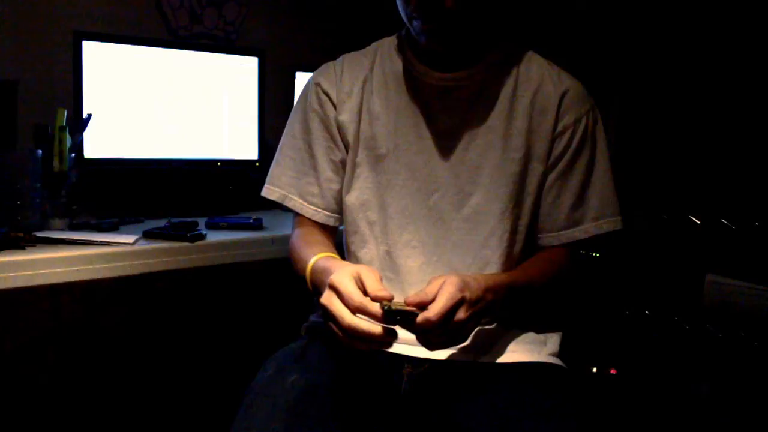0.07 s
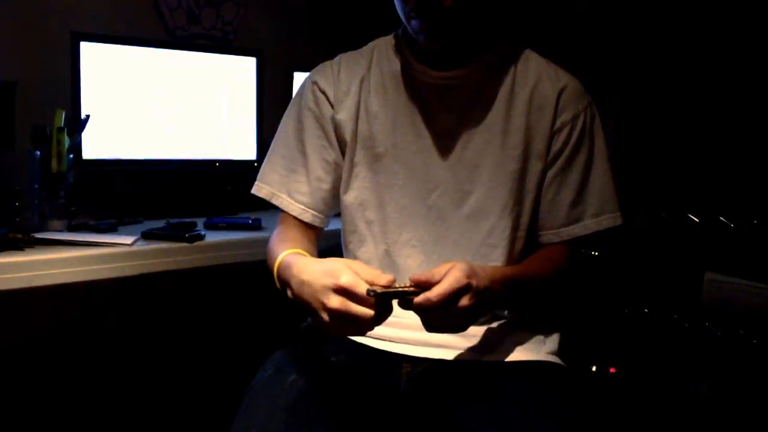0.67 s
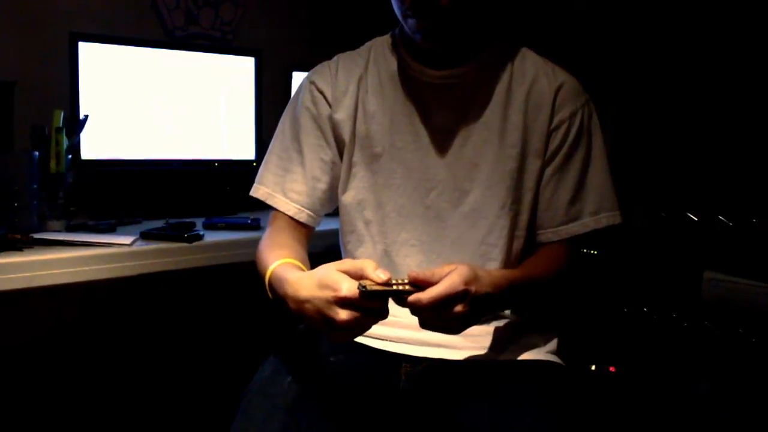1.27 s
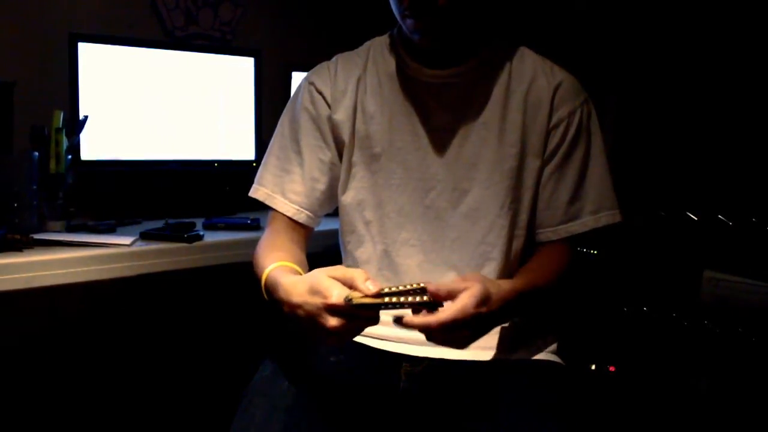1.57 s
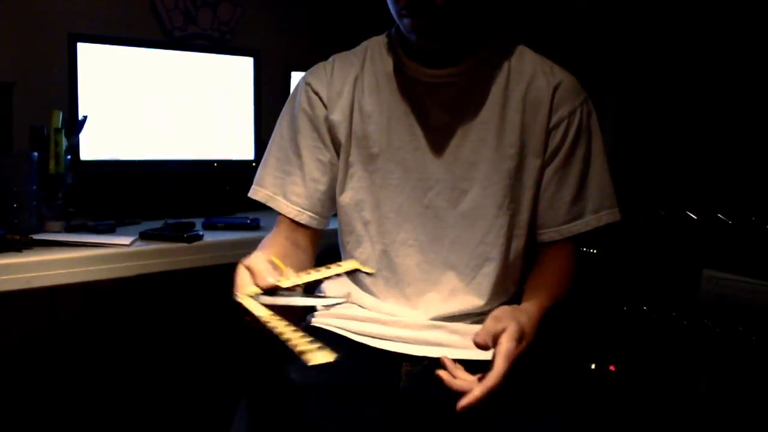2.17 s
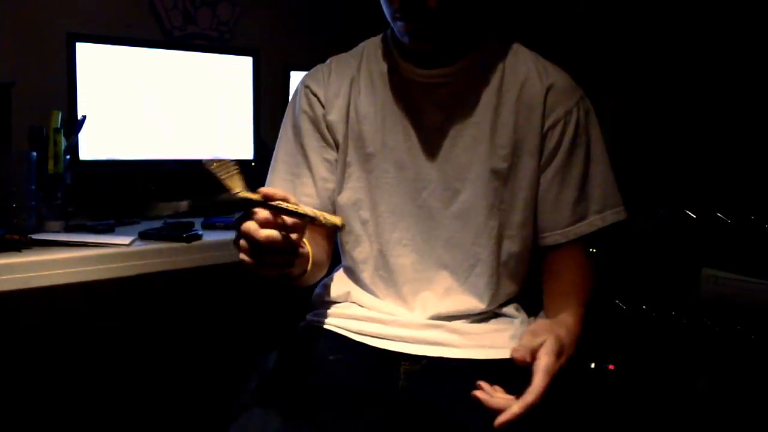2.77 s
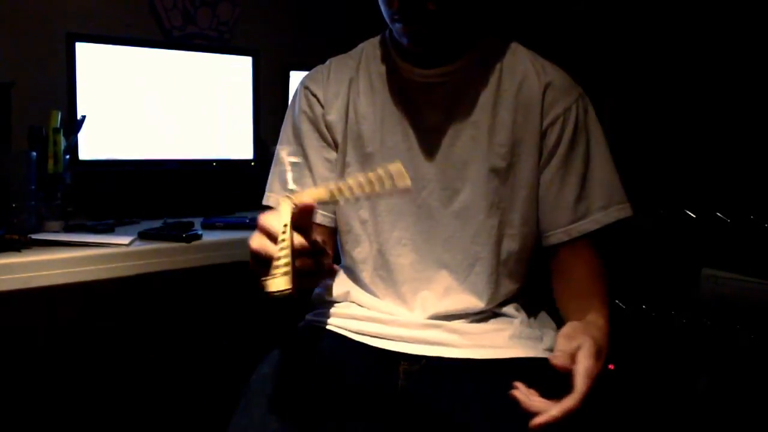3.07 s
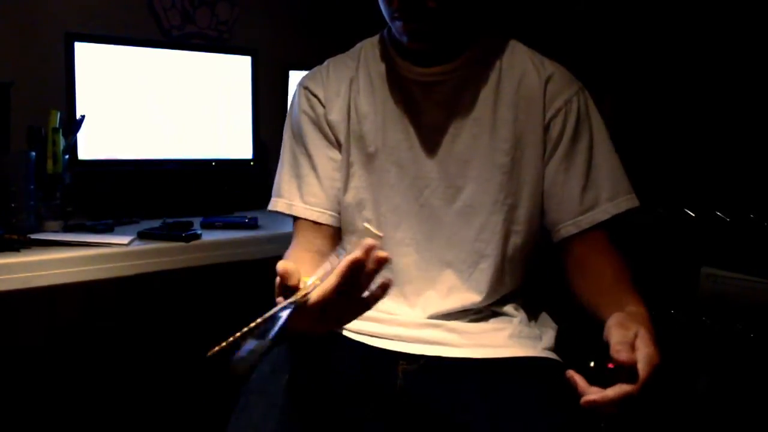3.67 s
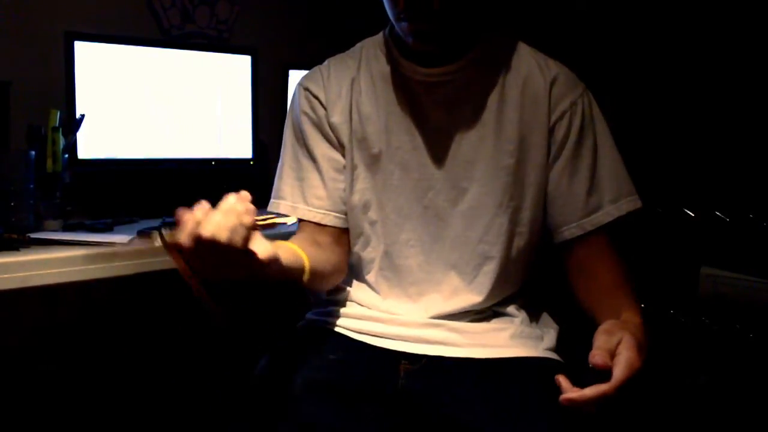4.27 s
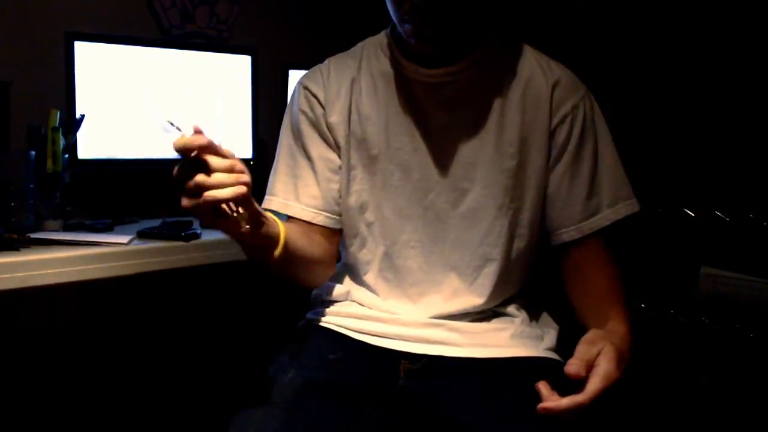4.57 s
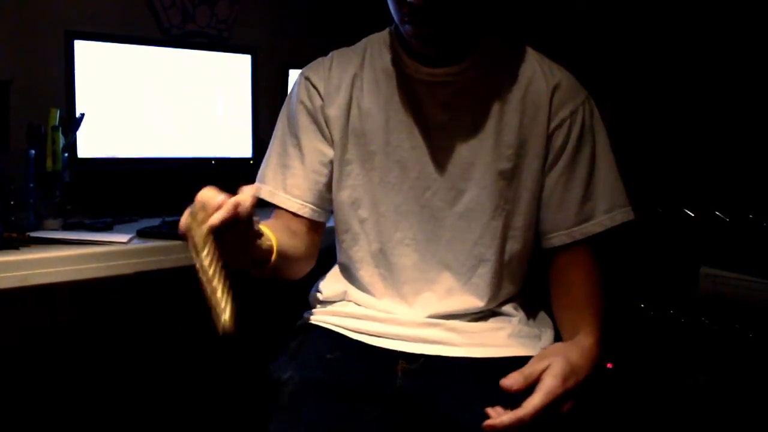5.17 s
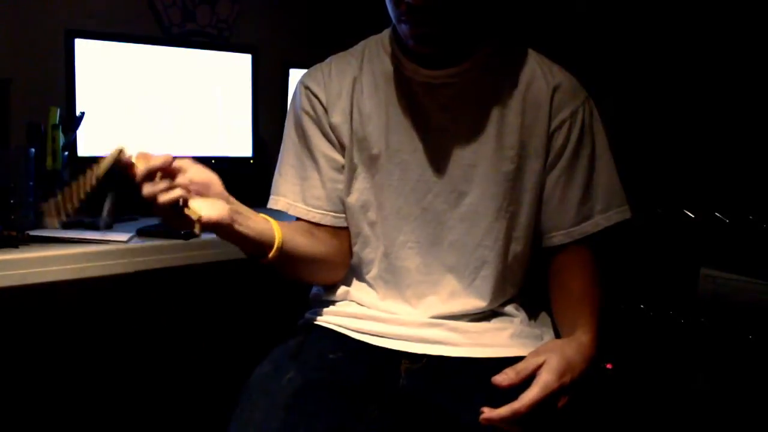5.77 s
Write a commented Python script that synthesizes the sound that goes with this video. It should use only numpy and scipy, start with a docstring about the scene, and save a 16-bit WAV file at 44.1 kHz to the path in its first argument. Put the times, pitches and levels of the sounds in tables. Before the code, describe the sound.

Light metal clicks, then two runs of sharp, ringing clacks as a butterfly knife swings open and shut in an echoing room.

```python
"""Butterfly knife flips

A butterfly knife is unlatched and flipped about a metre from a small microphone in a quiet,
hard-walled room. Handles and blade knock together and chatter in their loose pivots; each blow
rings the steel, then the room. It opens on the dying echo of one clack, over faint rumble and hiss."""
import sys
import numpy as np
from scipy import signal
from scipy.fft import rfft, irfft
from scipy.io import wavfile
from scipy.ndimage import uniform_filter1d

SR = 44100
rng = np.random.default_rng(int(sys.argv[2]) if len(sys.argv) > 2 else 0)


def waveform_to_disk(signal):
    """Save audio, clipped to [-1, 1], as 16-bit WAV at the path in sys.argv[1]."""
    frames = np.transpose(np.atleast_2d(signal))
    scaled = np.clip(frames, -1, 1) * 32767
    samples = np.round(scaled).astype(np.int16)
    wavfile.write(sys.argv[1], SR, samples)


N = 256220
OPENS_S = 0.16

# Handle and blade hits: t/s, relative level near 2.8 kHz/dB, chatter/s, main ring f/Hz,
# weight/dB, brightness/dB
BLOWS = [(1.109, -52.5, .012, 1600, 15.5, 1), (1.226, -50.5, 0.017, 3210, 3, 0),
         (1.249, -45.5, 0.0058, 3240, 8.5, 2), (1.344, -59.5, 0.0073, 1570, 10, 1),
         (1.571, -39.5, 0.028, 1710, 6, -4.5), (2.021, -50.5, 0.0057, 2165, 7.5, -0.5),
         (2.305, -52.5, 0.0037, 3230, 5.5, -6), (2.364, -54, .01, 2320, 7, -7),
         (2.451, -51, 0.0064, 1670, 11.5, -5), (2.5195, -20.5, 0.0097, 2810, 3, 4),
         (2.928, -43.5, 0.0057, 2980, 2.5, 0), (2.944, -27, 0.011, 3080, -2.5, 3),
         (2.969, -23.5, 0.024, 2800, 0, -1.5), (3.011, -27.5, 0.017, 3090, -0.5, -7.5),
         (3.092, -32.5, 0.0042, 2800, 5.5, -3), (3.115, -35.5, 0.01, 2630, 1.5, 1.5),
         (3.153, -21.5, 0.014, 3360, 9.5, 1.5), (3.189, -22, 0.03, 2820, -7.5, -1.5),
         (3.249, -27, 0.008, 2680, -13, -2.5), (3.334, -34, 0.0041, 3110, 6, -9),
         (3.342, -22, .007, 3036, -1.5, 1.5), (3.416, -30.5, 0.011, 2510, 2.5, -3),
         (3.53, -26.5, .013, 4020, -3, 4), (3.617, -26, 0.0089, 4110, -10.5, 3.5),
         (3.63, -22.5, 0.031, 3700, -1.5, -4), (3.715, -18, 0.02, 2800, 7, -1.5),
         (3.733, -13.5, 0.016, 2773, -2, 2), (3.75, -14.5, 0.022, 2730, -8, -0.5),
         (3.856, -28.5, 0.013, 3060, -0.5, 4), (3.895, -22, 0.012, 2740, -1.5, 3.5),
         (3.95, -34, 0.0037, 3180, 11, -4), (3.974, -20.5, 0.0083, 2960, -8.5, -0.5),
         (4.139, -36.5, 0.013, 2990, 8.5, 2), (4.376, -42, .014, 1670, 7, -9),
         (4.527, -53, 0.0051, 2710, -10.5, -5.5), (4.778, -41.5, 0.0095, 3410, 3, 0.5),
         (4.782, -22, 0.015, 3280, -6, -3), (4.9, -38.5, 0.0091, 3000, 0.5, 5),
         (5.116, -39, 0.0084, 2920, 4.5, -7.5), (5.216, -20.5, 0.046, 3060, 4, 4),
         (5.267, -17, 0.015, 2600, -2.5, -3), (5.281, -15.5, 0.0085, 3040, 0.5, 2),
         (5.327, -28.5, 0.011, 3100, 11, 4), (5.35, -15, 0.0097, 3220, -11, -3),
         (5.457, -29, 0.0068, 2630, 3, -1.5), (5.5045, -17.5, 0.0094, 3007, 2, -1),
         (5.561, -27, 0.012, 2940, 4, -4), (5.649, -30.5, 0.0092, 2610, 4.5, -3),
         (5.748, -15.5, .004, 3000, -11.5, -13), (5.777, -29, .01, 2630, 1.5, -6.5)]
# Room send, riding up and down as the hand turns: t/s, relative level/dB
ROOM_SEND = [(1.5, -1.5), (2.52, -1.5), (3.0, -6), (3.3, 0), (3.72, -1), (3.86, 10), (3.98, -4.5),
             (4.78, 7), (5.21, 4), (5.28, -1.5), (5.75, -7)]
def knife(force_db=41, direct_db=1.68, forward_db=-3, opening_db=-28):
    """All the clacks on three paths: straight at the microphone, forward and sideways into the room."""
    direct, forward, sideways = np.zeros((3, N))
    t = np.arange(6000) / SR
    grips = [steel_modes(t) for _ in range(9)]
    for k, (start, db, *character) in enumerate(BLOWS):
        modes = grips[k % len(grips)]
        send_db = np.interp(start, *np.transpose(ROOM_SEND))
        hit = clack(t, modes, db + force_db, *character)
        add(direct, start, hit * undb(direct_db))
        add(forward, start, hit * undb(send_db + forward_db))
        add(sideways, start, clack(t, modes, db + force_db + send_db, *character))
    # the opening clack is heard only through the room
    for path, modes in zip((forward, sideways), grips):
        hit = blow(t, modes, opening_db + force_db, tone_db=(-16.5, -10, -6),
                   chatter_s=0.038, ring_hz=2708, ring_db=11)
        add(path, OPENS_S, hit)
    return direct, forward, sideways


def clack(t, modes, db, chatter_s, ring_hz, weight_db, bright_db, rebound_s=0.0105):
    """One blow, then the other handle's rebound: weaker but heavier, with a ring of its own."""
    tone_db = np.array([-14.5 + 0.48 * weight_db, -10 + weight_db, -5 + bright_db])  # knock, lows, highs
    ring_db = 9.5 - 5 * np.log2(chatter_s / 0.01)  # a short contact rings cleanest
    hit = blow(t, modes, db, tone_db, chatter_s, ring_hz, ring_db)
    rebound = blow(t, modes, db - 13, tone_db + (3.5, 2.5, 2.5),
                   chatter_s=0.0093, ring_hz=2703, ring_db=7)
    add(hit, rebound_s, rebound)
    return hit


def blow(t, modes, db, tone_db, chatter_s, ring_hz, ring_db):
    """Steel on steel: the point of contact weights the modes, the angle sets the main ring and tone."""
    contacts = pivot_chatter(t, chatter_s)
    mode_gains = undb(-2 * rng.standard_normal(len(modes)))
    body = mode_gains @ modes + ring(t, ring_hz, ring_db, t60=0.028)
    body[0] += 1  # lets the bare crack through
    knock_db, low_db, high_db = tone_db
    eq_hz = [120, 420, 780, 1700, 2800, 4100, 8000]
    eq_db = [knock_db - 17, knock_db - 7, knock_db, low_db, 0, high_db, high_db - 3]
    hz = np.fft.rfftfreq(len(t), 1 / SR)[1:]
    shape_db = db + np.interp(np.log(hz), np.log(eq_hz), eq_db)
    # the EQ sets the energy in each region; chatter and modes only share it out
    gain_db = shape_db - contour(contacts, width_hz=480) - contour(body, width_hz=1500)
    struck = signal.fftconvolve(contacts, body)[:len(t)]
    return colour(struck, np.c_[hz, gain_db])


def pivot_chatter(t, chatter_s, contacts_per_s=1300, grit=0.22):
    """One hard contact, then a dying rattle from the play in the pivots; each contact cracks."""
    touches = rng.random(len(t)) < contacts_per_s / SR
    strength = rng.uniform(-1.07, 1, len(t))
    impacts = strength * touches * np.exp(-(t / chatter_s) ** 2)
    crack = grit * rng.standard_normal(len(t)) * fade(t, t60=0.012)
    impacts[0] = crack[0] = 1
    return signal.fftconvolve(impacts, crack)[:len(t)]


# Modes of handles and blade: f/Hz, level against the bare crack/dB, t60/s
STEEL_MODES = [(336.7, 11, 0.21), (861, 3, 0.12), (991, -5.5, 0.13), (1493, -7, 0.047), (1688, 5, 0.063),
               (1770, -8.5, 0.093), (2202, -5.5, 0.031), (2423, -1.5, 0.055), (2652, 5.5, .12),
               (2976, -2.5, 0.17), (3220, -5.5, 0.058), (3350, -10.5, 0.15), (3990, -12, 0.24),
               (3855, 6.5, 0.095), (3990, 2, 0.05), (4617, 7, 0.11), (4710, 2, 0.037), (7350, 9.5, 0.13),
               (8100, 14, 0.18), (9100, 4.5, 0.088)]
def steel_modes(t, detune=0.0036):
    """The steel's modes for one way of holding and opening the knife, each shifted a little."""
    return np.array([ring(t, hz * (1 + detune * rng.standard_normal()), db, t60)
                     for hz, db, t60 in STEEL_MODES])


def ring(t, hz, db, t60):
    """A mode's decaying tone, scaled so that its resonance peaks at db."""
    return undb(db) * 2 * np.log(1000) / (t60 * SR) * np.cos(2 * np.pi * hz * t) * fade(t, t60)


# Ring-outs after certain hits: t/s, f/Hz, level/dB, t60/s
RING_OUTS = [(1.568, 1750, -40.5, 0.12), (1.578, 2657, -40.5, 0.21), (1.578, 3930, -51.5, 0.13),
             (2.52, 4080, -23.5, 0.1), (2.52, 4630, -14.5, 0.098), (2.518, 7520, -21, 0.13),
             (2.52, 880, -49.5, 0.056), (3.617, 847, -33.5, 0.18), (5.505, 3890, -29, 0.26),
             (5.749, 2930, -37, 0.024), (5.749, 850, -32.5, 0.32)]
def singing_steel():
    """A part that swings clear of the hand sings on in pure, fading tones."""
    track = np.zeros(N)
    t = np.arange(SR // 2) / SR
    for start, hz, db, t60 in RING_OUTS:
        add(track, start, undb(db) * np.sin(2 * np.pi * hz * t) * fade(t, t60))
    return track


# Reverb bands of the hard-walled room: f/Hz, relative level/dB, t60/s
REVERB_BANDS = [(150, 5, 0.57), (504, 2.5, 1), (1290, 3, 0.94), (2470, -1, 0.82), (3950, -0.5, 0.64),
                (5300, -3, 0.47), (8000, -1.5, 0.63)]
def room(x, wet_db=-4, predelay_s=0.0054, attack_s=0.0016, early_per_s=1200, mixing_s=0.05):
    """Separate wall reflections thicken into a diffuse tail whose mids hang on longest."""
    t = np.arange(SR) / SR
    density = np.minimum(early_per_s / SR * (1 + (t / mixing_s) ** 2), 1)
    echoes = rng.standard_normal(SR) * (rng.random(SR) < density) / np.sqrt(density)
    spectrum = rfft(echoes)
    log_hz = np.log(np.maximum(np.fft.rfftfreq(SR, 1 / SR), 1))
    centres = np.log(np.array(REVERB_BANDS)[:, 0])
    tail = np.zeros(SR)
    for share, (_, db, t60) in zip(np.eye(len(centres)), REVERB_BANDS):
        band = irfft(spectrum * np.interp(log_hz, centres, share), SR)
        tail += band * undb(db) * fade(t, t60)
    tail *= np.clip((t - predelay_s) / attack_s, 0, 1)
    return undb(wet_db) * signal.fftconvolve(x, tail / np.linalg.norm(tail))[:N]


# Microphone EQ, deeply notched near 6 kHz: f/Hz, level/dB
MIC_EQ = [(30, -11.5), (4100, 1), (4700, -7), (5200, -14), (5700, -35.5), (6200, -43), (6700, -27),
          (7300, -20.5), (8200, -23), (9200, -32), (9700, -43.5), (10300, -55)]
def microphone(x):
    """The small microphone favours the upper mids and dulls the top."""
    return colour(x, MIC_EQ)


# Spectrum of the noise bed: f/Hz, relative level/dB
ROOM_TONE = [(15, -31), (25, -0.5), (59, -1.5), (134, -7.5), (227, -7.5), (365, -7.5), (404, -13),
             (519, -11.5), (1280, -19.5), (1380, -21), (4160, -27.5), (4830, -43), (10000, -77.5),
             (13000, -101), (22000, -120)]
def room_tone(rms_db=-52):
    """Steady rumble and hiss of the quiet room."""
    bed = colour(rng.standard_normal(N), ROOM_TONE, size=8192)
    return bed / np.sqrt(np.mean(bed ** 2)) * undb(rms_db)


def gain_control(x, threshold_db=-24, memory_s=0.5, slope=0.38):
    """Automatic gain ducks a little after loud clatter and slowly recovers."""
    keep = np.exp(-1 / (memory_s * SR))
    power = signal.lfilter([1 - keep], [1, -keep], x ** 2)
    return x * (1 + power / undb(threshold_db) ** 2) ** -slope


def undb(db):
    """Decibels to gain."""
    return 10 ** (np.asarray(db) / 20)


def fade(t, t60):
    """Exponential decay, 60 dB down after t60."""
    return np.exp(-np.log(1000) * t / t60)


def add(track, start, x):
    """Mix x into the track at start seconds."""
    i = int(start * SR)
    track[i:i + len(x)] += x[:len(track) - i]


def colour(x, points, size=2048):
    """Minimum-phase EQ through points of f/Hz, level/dB."""
    hz, db = np.transpose(points)
    grid_hz = np.maximum(np.fft.rfftfreq(size, 1 / SR), 1)
    gain = undb(np.interp(np.log(grid_hz), np.log(hz), db))
    cepstrum = irfft(np.log(gain))
    # folding the cepstrum makes the filter causal
    cepstrum[1:size // 2] *= 2
    cepstrum[size // 2 + 1:] = 0
    impulse = irfft(np.exp(rfft(cepstrum)))
    return signal.fftconvolve(x, impulse)[:len(x)]


def contour(x, width_hz):
    """Power spectrum in dB, averaged over width_hz."""
    power = np.abs(rfft(x)[1:]) ** 2
    return 10 * np.log10(uniform_filter1d(power, int(width_hz * len(x) / SR)))


def scene():
    """Knife and reverb through the microphone, over the room tone."""
    direct, forward, sideways = knife()
    singing = singing_steel()
    reverb = room(forward + 0.5 * singing) + room(sideways + 0.5 * singing)
    return (microphone(direct + singing + reverb) + room_tone())[None]


def record(dry, fade_in_s=0.0082, top_hz=10000):
    """A fast fade-in just after the start, then automatic gain and a steep high cut."""
    fade_in = np.clip((np.arange(N) / SR - OPENS_S) / fade_in_s, 0, 1)
    high_cut = signal.ellip(8, 0.2, 70, top_hz, fs=SR, output="sos")
    return signal.sosfilt(high_cut, gain_control(dry * fade_in))


dry = scene()
out = record(dry)
waveform_to_disk(out)
```